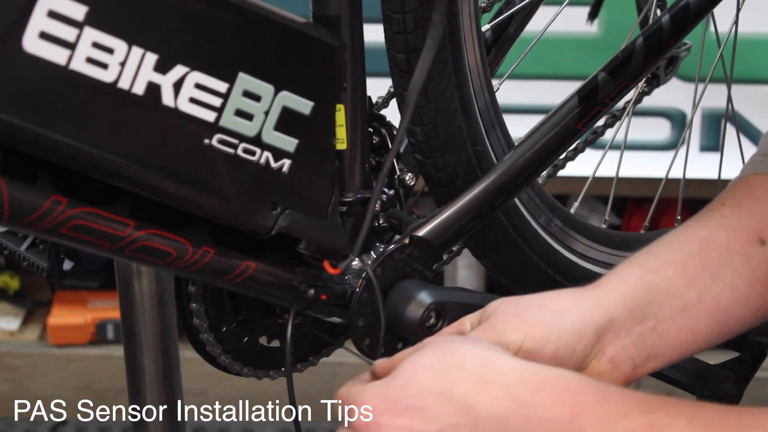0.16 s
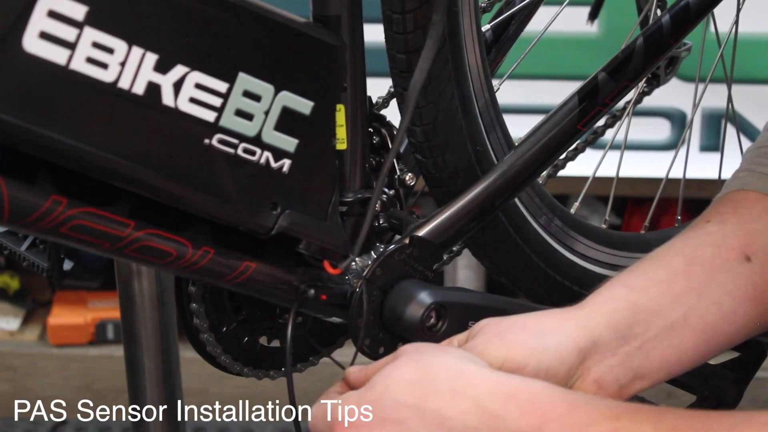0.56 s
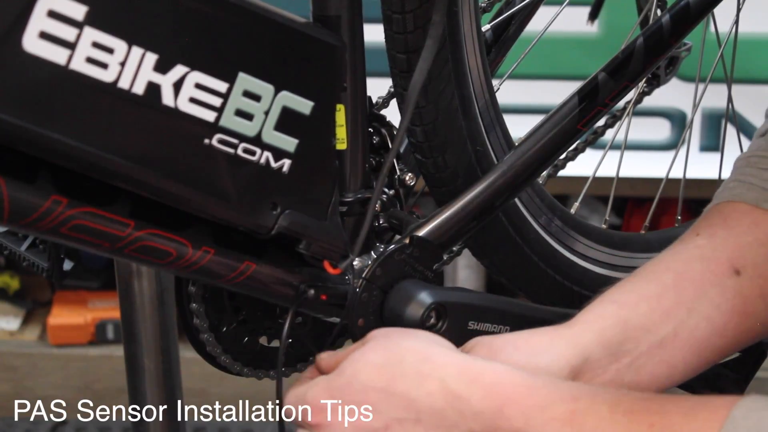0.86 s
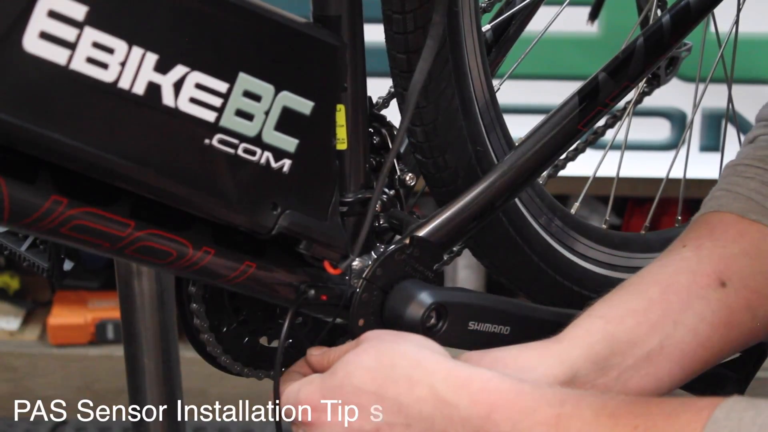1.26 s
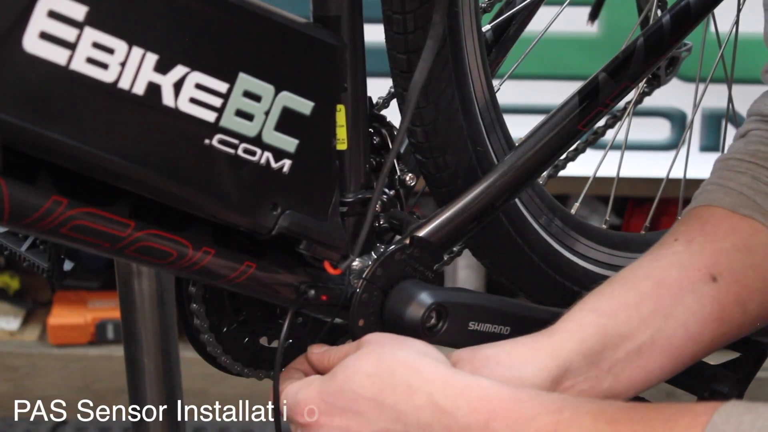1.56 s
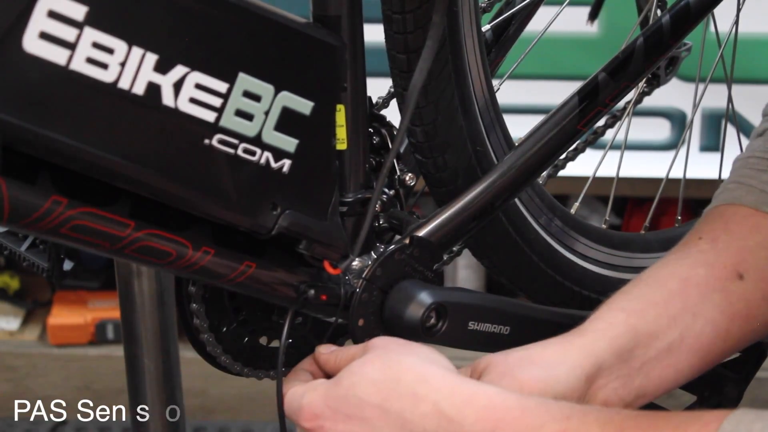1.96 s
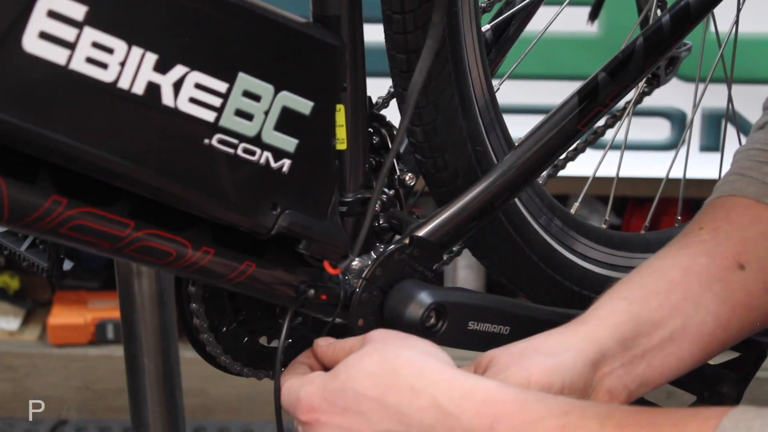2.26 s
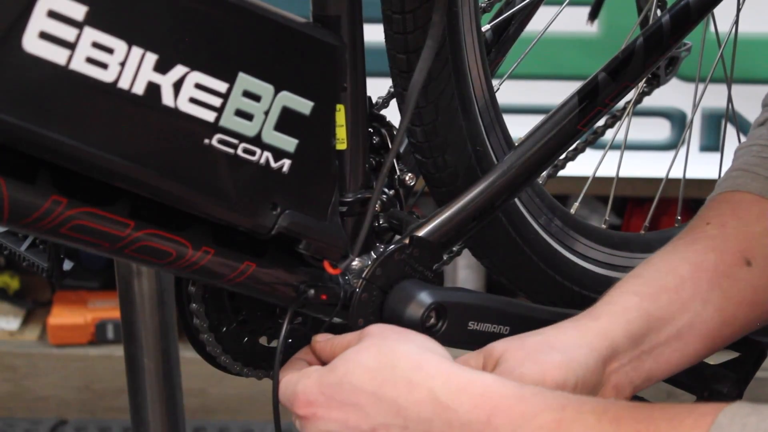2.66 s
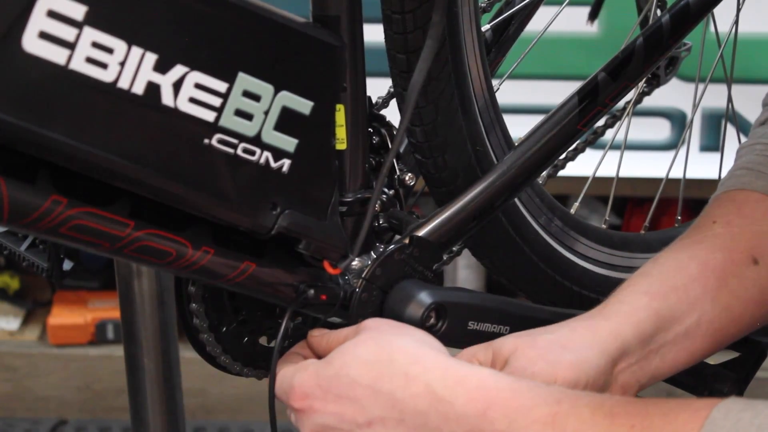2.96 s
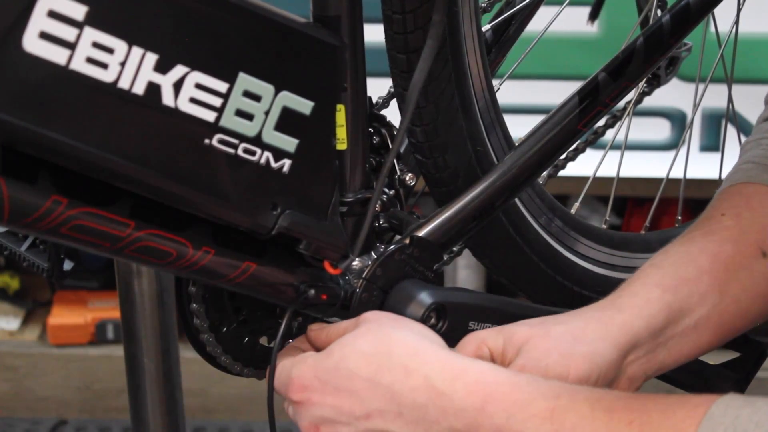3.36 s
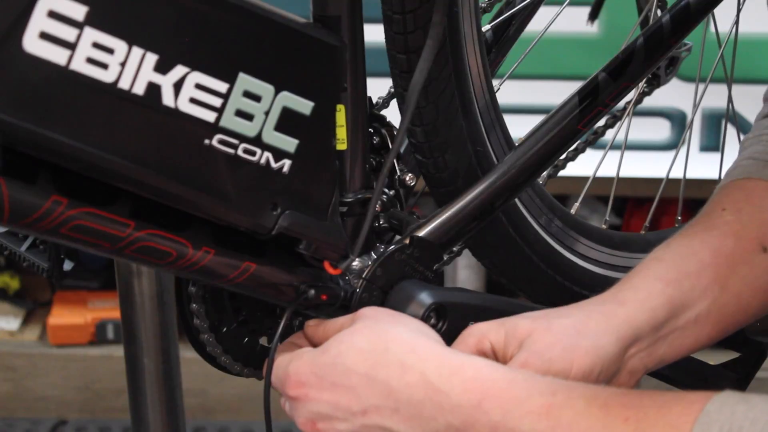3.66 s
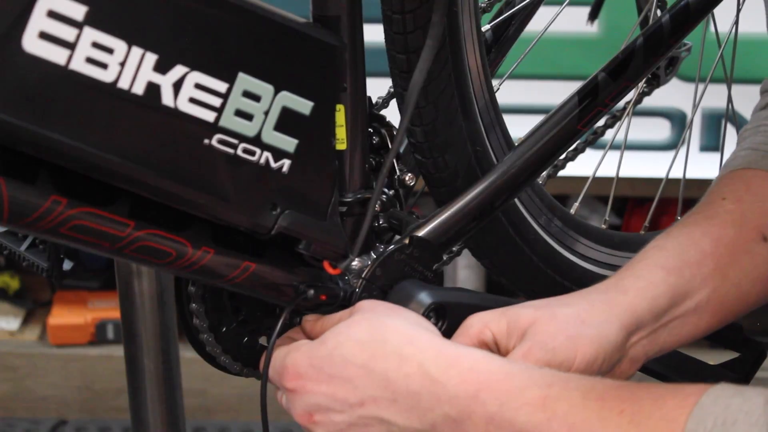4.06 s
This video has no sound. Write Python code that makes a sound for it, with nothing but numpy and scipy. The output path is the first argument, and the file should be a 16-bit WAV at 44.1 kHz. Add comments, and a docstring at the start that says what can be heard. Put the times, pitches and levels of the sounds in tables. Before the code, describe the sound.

A nylon zip tie is pulled tight around a bicycle frame, heard close up in a small workshop with faint room air and electrical hum. Fingers brush softly along the ribbed strap at the start. Two short runs of bright plastic clicks come at about 0.3 and 0.5 seconds, then a longer rasp surges three times from 0.6 to 1.1 seconds. Small clusters and separate clicks follow until a hard yank near 1.7 seconds, a dense zip with gritty ticks as the loop seats on the frame. From here the clicks carry a little more knock. Four short, slowing bursts come at roughly 2.1, 2.3, 2.5 and 2.8 seconds. From 2.9 to about 4.1 seconds the tie advances one tooth at a time, in slightly quieter, unevenly spaced sharp clicks, each with a brief room reflection.

```python
"""Tightening a zip tie

A nylon zip tie is pulled tight round a bicycle frame in a small workshop, heard from close by.
The pawl snaps over each tooth: short runs and a long rasp while the loop is slack, one hard yank,
then single clicks. Each snap excites the modes of pawl and strap, which shift as the strap slides,
and the tightening loop couples it into the frame. Room air and mains hum lie underneath."""
import sys
import numpy as np
from scipy import signal
from scipy.fft import rfft, irfft, next_fast_len
from scipy.io import wavfile
from scipy.ndimage import uniform_filter1d, map_coordinates

SR = 44100
rng = np.random.default_rng(int(sys.argv[2]) if len(sys.argv) > 2 else 0)


def unload_audio(sound):
    """Save the sound as a 16-bit wav file, at the path given as the first command line argument."""
    columns = np.transpose(np.atleast_2d(sound))
    # keep every value between -1 and 1, then stretch to whole-number steps
    steps = np.round(np.clip(columns, -1, 1) * 32767)
    wavfile.write(sys.argv[1], SR, steps.astype(np.int16))


N = 186013


def amp(db):
    return 10 ** (np.asarray(db) / 20)


def unit_rms(x):
    return x / np.sqrt(np.mean(x ** 2) + 1e-20)


def along(points, hz):
    """Interpolation on a logarithmic frequency axis."""
    f, values = np.transpose(points)
    return np.interp(np.log(hz + 1), np.log(f + 1), values)


def at(rows, times):
    """Linear interpolation of each column in time."""
    s, *columns = np.transpose(rows)
    return [np.interp(times, s, column) for column in columns]


def filtered(x, response):
    """Filtering as multiplication of the spectrum by a frequency response."""
    size = next_fast_len(N + SR // 2)
    return irfft(rfft(x, size) * response(np.fft.rfftfreq(size, 1 / SR)), size)[:N]


def resonance(hz, centre, width):
    """Power response of a steep-sided resonance, 6 dB down at centre +/- width."""
    return 1 / (1 + ((hz - centre) / width) ** 2) ** 2


def radiation(hz, corner_hz):
    """Radiation efficiency: a small body radiates little power below a corner frequency."""
    return hz ** 6 / (hz ** 6 + corner_hz ** 6)


def dispersion(hz, travel):
    """Bending waves are dispersive: the low frequencies of a click arrive last."""
    delay = travel * np.sqrt(1000 / (hz + 2500))
    lag = delay - np.interp(14000, hz, delay)
    return np.exp(-2j * np.pi * np.cumsum(lag) * hz[1])


def minimum_phase(power):
    """Causality: each power spectrum gets the phase that makes it ring after the blow."""
    cepstrum = irfft(np.log(power + 1e-9) / 2)
    half = cepstrum.shape[-1] // 2
    cepstrum[:, 1:half] *= 2
    cepstrum[:, half + 1:] = 0
    return np.exp(rfft(cepstrum))


def scaled(spectra, band, db):
    """Normalisation of each spectrum to a mean level in a band."""
    return spectra * amp(db) / np.sqrt(np.mean(abs(spectra[:, band]) ** 2, axis=1, keepdims=True))


def placed(times, shapes, jitter_s=.00007):
    """Superposition of short sounds at slightly jittered start times."""
    times = times + jitter_s * rng.standard_normal(times.shape)
    index = np.round(times * SR).astype(int) + np.arange(shapes.shape[1])
    return np.bincount(index.ravel(), shapes.ravel(), N)[:N]


# Spectrum of the room air: (frequency [Hz], relative spectral density [dB])
AIR_SPECTRUM = [(15, -52), (25, -8), (92, -3.5), (476, -4.5), (734, -5.5), (1290, -7.5), (1440, -6),
                (1610, -12), (2110, -12.5), (4740, -17), (5280, -12.5), (5730, -17), (8830, -19),
                (12900, -18.5), (16000, -29)]
# Partials of the hum: (frequency [Hz], level [dB])
HUM_PARTIALS = [(59, -68), (120, -71.5), (335, -75.5), (383, -73), (717, -70), (1132, -76)]
def air_and_hum(air_db=-58.0, waver_rad=0.096, knots=30):
    """Stationary noise of the air, plus tones of mains equipment under slow phase modulation."""
    t = np.arange(N) / SR
    air = unit_rms(filtered(rng.standard_normal(N), lambda hz: amp(along(AIR_SPECTRUM, hz))))
    hum = 0
    for hz, db in HUM_PARTIALS:
        phase = 2 * np.pi * (hz * t + rng.random())
        drift = map_coordinates(rng.standard_normal(knots), [np.linspace(0, knots - 1, N)])
        hum += amp(db) * np.sqrt(2) * np.sin(phase + waver_rad * drift)
    return amp(air_db) * air + hum


# Decay of the workshop: (frequency [Hz], reverberation time [s])
REVERB_TIMES = [(500, 0.84), (2000, 0.41), (6000, 0.31), (12000, 0.28), (16000, 0.2)]
def diffuse_response(near_db=-5.5, near_t60=0.043, near_rise_s=.002, room_db=-7.5, room_rise_s=0.005):
    """Diffuse fields decay exponentially: quick scatter off the bicycle, then the room's longer tail."""
    hz, t, noise = signal.stft(rng.standard_normal(SR // 2), SR, nperseg=256)
    decay = amp(-60 * t / along(REVERB_TIMES, hz)[:, None])
    room = signal.istft(noise * decay, SR, nperseg=256)[1]
    t = np.arange(len(room)) / SR
    room *= 1 - np.exp(-t / room_rise_s)
    near = rng.standard_normal(len(t)) * amp(-60 * t / near_t60) * (1 - np.exp(-t / near_rise_s))
    return amp(room_db) * room / np.linalg.norm(room) + amp(near_db) * near / np.linalg.norm(near)


# Echoes from the wheel, frame and arms: (delay [s], gain [dB])
REFLECTIONS = [(.0007, -12), (.0013, -17), (.0024, -20), (.0037, -15), (.0048, -19), (.0064, -17),
               (.0106, -20), (.0142, -26), (.0212, -25)]
def workshop(x, segments=15):
    """Fixed early reflections plus short reverberation, its tail drawn afresh for each segment."""
    segment = np.arange(N) * segments // N
    wet = sum(amp(db) * np.pad(x, (round(delay * SR), 0))[:N] for delay, db in REFLECTIONS)
    for k in range(segments):
        wet += signal.fftconvolve(x * (segment == k), diffuse_response())[:N]
    return wet


# Envelope of the fingers running along the tail: (time [s], level [dB])
RUB_ENVELOPE = [(0, -61.5), (.05, -54), (.095, -58), (.125, -84), (.2, -90)]
def fingers():
    """Friction noise: skin brushes the ribbed tail of the tie in uneven grains."""
    colour = [(800, -41), (2400, -11), (4500, -6.0), (9000, -8.5), (14000, -4.5)]  # (Hz, dB)
    grains = rng.standard_normal(N) * amp(6.3 * rng.standard_normal(N))
    rub = filtered(grains, lambda hz: amp(along(colour, hz)))
    return unit_rms(rub) * amp(at(RUB_ENVELOPE, np.arange(N) / SR)[0])


# The loop slips and seats on the frame: (time [s], relative level [dB], centre frequency [Hz])
LOOP_SLIPS = [(0.241, -28, 6100), (.287, -23, 7140), (1.6718, -2, 9500), (1.6746, -1, 5300),
              (1.7, -10, 4370), (1.7261, -2, 5500), (1.745, -2.5, 4000), (1.752, -5, 4260),
              (1.8595, -19, 3700), (1.8794, -17, 10800), (1.879, -19.5, 3800), (1.897, -11.5, 3800),
              (2.165, -20, 3940), (2.1996, -15.5, 2580), (2.2317, -9.5, 2390), (2.2607, -12, 5170),
              (2.7266, -11, 3470), (2.739, -14, 3480)]
def slips(size=512, lead_s=0.001014, grit_db=-15, grit_t60=0.017, gain_db=-2):
    """Stick-slip motion: each jerk of the loop is a dull, gritty tick that also shoves the frame."""
    s, db, centre = np.transpose(LOOP_SLIPS)[:, :, None]
    width = 0.73 * centre * 2 ** (db / 14)  # a slip 14 dB harder is twice as broad
    hz = np.fft.rfftfreq(size, 1 / SR)
    t = (np.arange(size) - round(lead_s * SR)) / SR
    grit = rng.standard_normal((len(s), size)) * amp(grit_db - 60 * abs(t) / grit_t60)
    force = rfft((t == 0) + grit) * dispersion(hz, travel=0.00484)
    tick = resonance(hz, centre, width) * radiation(hz, corner_hz=1080)
    thud = amp(-13) ** 2 * resonance(hz, centre=485, width=290)
    spectra = force * minimum_phase(tick + thud)
    band = (hz > 2000) & (hz < 9000)
    return placed(s - lead_s, irfft(scaled(spectra, band, db + gain_db)))


# Modes of the frame and fittings: (frequency [Hz], width before damping factor [Hz], relative level [dB])
FRAME_MODES = [(850, 300, -15), (1550, 150, -7), (1850, 150, -1), (2400, 160, -1), (3380, 140, 0),
               (3930, 150, 2.5), (5150, 260, -7), (5950, 230, -9), (7100, 250, -5)]
# Passband of the loop: (time [s], centre frequency [Hz], roll-off [dB/octave])
LOOP_COUPLING = [(.57, 5400, 5.5), (.66, 1950, 7), (1.25, 1790, 7.5), (2.06, 1740, 7.5), (2.3, 1960, 2.5),
                 (2.52, 3340, 3), (2.74, 3370, 18), (2.82, 2900, 4), (2.91, 3300, 4.5), (3.08, 2700, 6),
                 (3.7, 2550, 8), (4.1, 2750, 21)]
def frame_power(hz, s, damping):
    """Mechanical coupling: the loop passes a band to the frame's modes, depending on where it sits."""
    centre, roll_off = at(LOOP_COUPLING, s)
    modes = sum(amp(db) ** 2 * resonance(hz, f, damping * width) for f, width, db in FRAME_MODES)
    coupling = amp(-roll_off * abs(np.log2((hz + 1) / centre))) ** 2
    return modes * coupling * radiation(hz, corner_hz=620)


# Bending modes of the strap, moving with the grip:
# (time [s], low mode [Hz], middle mode [Hz], level of low mode re middle [dB])
STRAP_MODES = [(.56, 12000, 12800, -1), (.66, 9500, 12500, -5.5), (.79, 10000, 12600, -2.5),
               (.87, 11000, 13500, -3), (1.06, 10700, 12800, -12), (1.22, 9000, 12700, -10.5),
               (1.6, 8700, 12700, -19), (1.72, 9150, 11550, -2.5), (2.1, 9650, 11850, -2),
               (2.75, 10100, 13800, -15), (3.15, 7730, 12700, -5), (3.55, 9900, 11950, -2.5),
               (4.1, 10200, 13100, -9.5)]
# Modes of the pawl in its head: (frequency [Hz], width [Hz], relative level [dB])
PAWL_MODES = [(7800, 1300, -15), (10600, 1800, -12), (12450, 600, -4.5), (14000, 1500, -5.5),
              (15450, 500, -2.5)]
def nylon_power(hz, s, snap_db, grip, broadening, dulling=0.22):
    """Modal summation: three shifting strap modes and the fixed pawl modes add in power."""
    low, middle, low_db = at(STRAP_MODES, s)
    low, middle = grip * low, grip * middle
    modes = [(low, 700, low_db), (middle, 480, 0), (1.13 * middle, 520, -1)] + list(PAWL_MODES)
    power = sum(amp(db) ** 2 * resonance(hz, f, broadening * width) for f, width, db in modes)
    tilt_db = dulling * snap_db * np.log2((hz + 1) / middle)  # a softer snap has less treble
    return power * radiation(hz, corner_hz=4400) * amp(tilt_db) ** 2


# Short pulls: (start [s], end [s], teeth [count], last gap over first gap [ratio], relative level [dB])
SHORT_PULLS = [(.2972, .383, 6, 1.9, -3.7), (.4675, .568, 6, .62, -2.8), (1.2083, 1.251, 3, 1.93, -1.7),
               (1.602, 1.645, 3, 1.47, -3.7), (1.665, 1.7625, 14, 1.27, -3), (2.056, 2.116, 6, 2, -3.4),
               (2.2245, 2.301, 8, 2, -5.3), (2.501, 2.584, 5, 1.89, -5.3), (2.7277, 2.827, 6, 2.93, -5)]
# The long rasp, drawn in three surges: (time [s], tooth rate [1/s])
RASP_RATE = [(.6075, 31), (.642, 100), (.676, 47), (.781, 125), (.799, 166), (.818, 145), (.912, 65),
             (.969, 111), (1.07, 51)]
# One tooth at a time: (time [s], relative level [dB])
SINGLE_CLICKS = [(1.3561, -2.5), (1.4016, -3.5), (1.475, -4), (2.9076, -6), (2.9838, -7), (3.0638, -7.5),
                 (3.147, -8), (3.2137, -7.5), (3.3125, -8), (3.388, -8.5), (3.5377, -8.5), (3.5899, -7.5),
                 (3.6447, -8), (3.7322, -7.5), (3.8034, -6.5), (3.9444, -8), (4.1032, -7.5)]
def teeth(rasp_start_db=-6.5, rasp_end_db=-2.5, jitter_s=.0003):
    """An impulse train: the time and level of each tooth, spaced by the speed of the strap."""
    rows = list(SINGLE_CLICKS)
    for start, end, count, slowing, db in SHORT_PULLS:
        gaps = slowing ** np.linspace(0, 1, round(count) - 1)
        run = np.cumsum(np.r_[0, gaps])
        rows += [(s, db) for s in start + (end - start) * run / run[-1]]
    t = np.arange(RASP_RATE[0][0], RASP_RATE[-1][0], 1 / SR)
    passed = np.cumsum(at(RASP_RATE, t)[0]) / SR
    drops = np.interp(np.arange(passed[-1]), passed, t)
    rows += zip(drops, np.linspace(rasp_start_db, rasp_end_db, len(drops)))  # the hand pulls harder
    s, db = np.transpose(sorted(rows))[:, :, None]
    return s + jitter_s * rng.standard_normal(s.shape), db


# The yank takes up the slack: (time [s], tension [0 slack to 1 taut])
LOOP_TENSION = [(.3, 0.13), (1.06, 0.06), (1.65, 0.3), (1.7, 0.81), (2.08, 0.58), (2.25, 0.86), (4.1, 0.85)]
def tooth_impacts():
    """Tension governs coupling: a taut loop knocks the frame harder and damps it less."""
    s, db = teeth()
    scatter = rng.standard_normal((len(s), 3)).T[:, :, None]  # no two teeth are alike
    tension = at(LOOP_TENSION, s)[0]
    snap_db = db - 0.12 * scatter[0]
    knock_db = db + np.interp(tension, [0, 1], [-15.5, -5]) + 0.3 * scatter[1]
    damping = np.interp(tension, [0, 1], [4.9, 1.36])  # factor on the frame's mode widths
    grip = 1 + .012 * scatter[2]  # factor on the strap's mode frequencies
    return s, snap_db, knock_db, damping, grip


def pawl_force(t, hz, grit, count, scrape_db=-25, chatter_db=-22, chatter_t60=0.0085):
    """Impulsive excitation, one spectrum a tooth: a scrape over the crest, the snap, then chatter."""
    noise = rng.standard_normal((count, len(t)))
    texture = unit_rms(uniform_filter1d(noise, size=4, axis=0))  # alike on neighbouring teeth
    envelope = np.where(t < 0, amp(scrape_db), amp(chatter_db - 60 * abs(t) / chatter_t60))
    return rfft((t == 0) + grit * envelope * texture) * dispersion(hz, travel=0.00293)


def ratchet(impacts, broadening, grit, snap_gain_db, knock_gain_db, size=512, lead_s=0.0005):
    """Source and filter: the pawl's force rings the nylon as a snap and the frame as a knock."""
    s, snap_db, knock_db, damping, grip = impacts
    hz = np.fft.rfftfreq(size, 1 / SR)
    t = (np.arange(size) - round(lead_s * SR)) / SR
    force = pawl_force(t, hz, grit, count=len(s))
    nylon = minimum_phase(nylon_power(hz, s, snap_db, grip, broadening))
    frame = minimum_phase(frame_power(hz, s, damping))
    snaps = scaled(force * nylon, band=(hz > 7000) & (hz < 15700), db=snap_db + snap_gain_db)
    knocks = scaled(force * frame, band=(hz > 1200) & (hz < 7000), db=knock_db + knock_gain_db)
    return placed(s - lead_s, irfft(snaps + knocks))


def scene():
    """Directivity: one side of the tie is heard directly; the room gets the smoother sum of all sides."""
    impacts = tooth_impacts()
    handling = slips() + fingers()
    direct = ratchet(impacts, broadening=1, grit=.6, snap_gain_db=-0.15, knock_gain_db=-2.0)
    all_round = ratchet(impacts, broadening=1.3, grit=0, snap_gain_db=1.1, knock_gain_db=0.33)
    return (direct + handling + workshop(all_round + handling) + air_and_hum())[None]


def record(dry, cutoff_hz=15900):
    """Band limiting by a very steep low-pass filter."""
    return np.array([filtered(x, lambda hz: 1 / np.sqrt(1 + (hz / cutoff_hz) ** 260)) for x in dry])


dry = scene()
out = record(dry)
unload_audio(out)
```